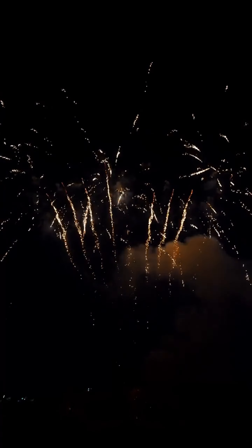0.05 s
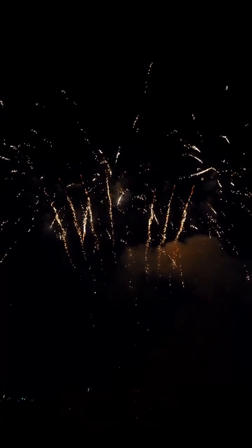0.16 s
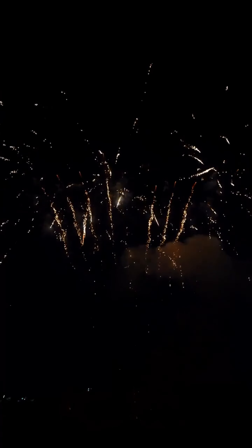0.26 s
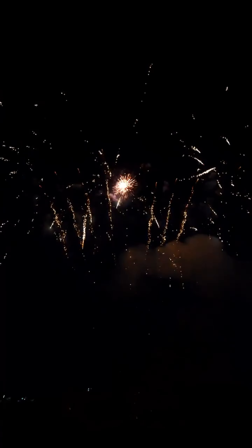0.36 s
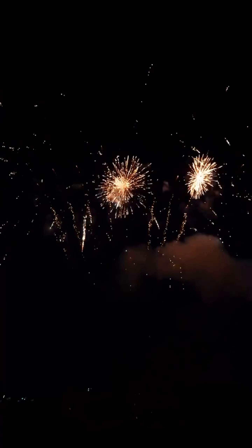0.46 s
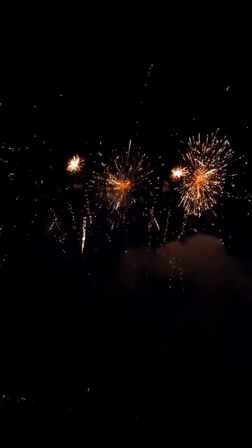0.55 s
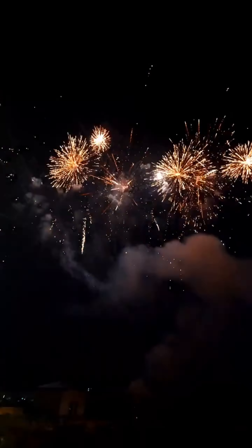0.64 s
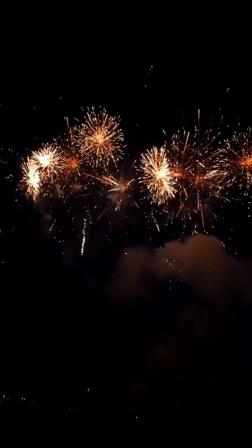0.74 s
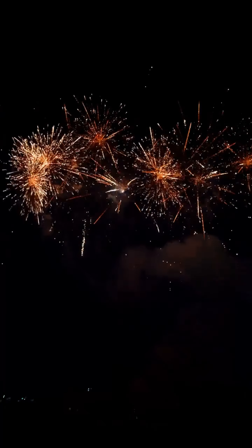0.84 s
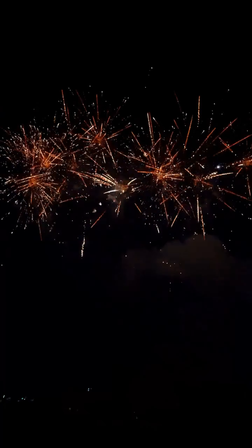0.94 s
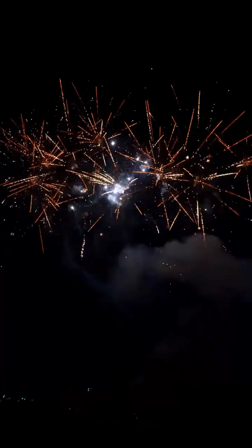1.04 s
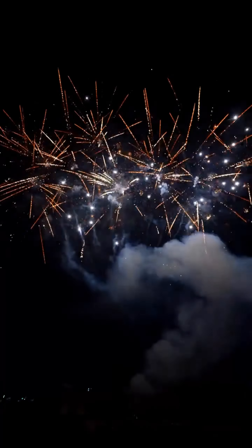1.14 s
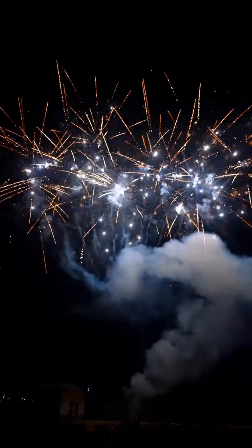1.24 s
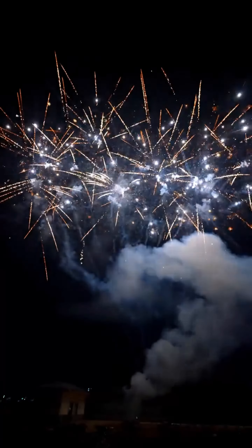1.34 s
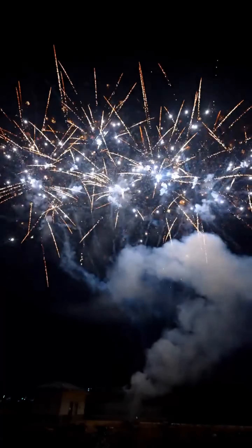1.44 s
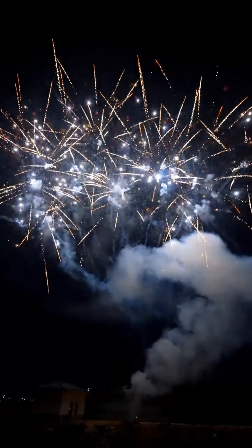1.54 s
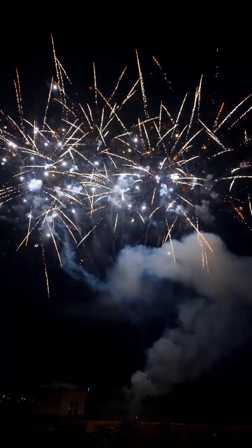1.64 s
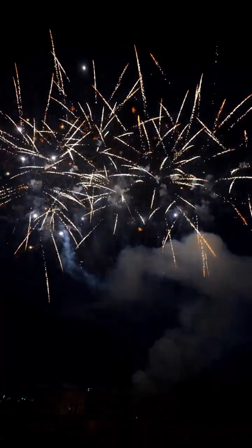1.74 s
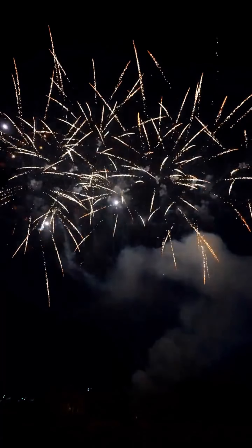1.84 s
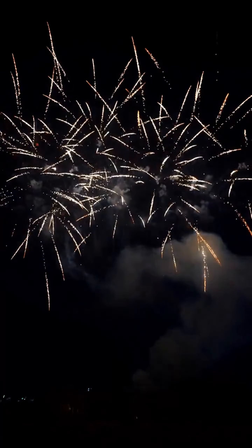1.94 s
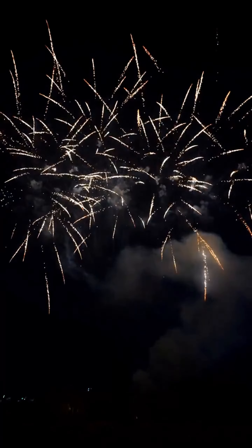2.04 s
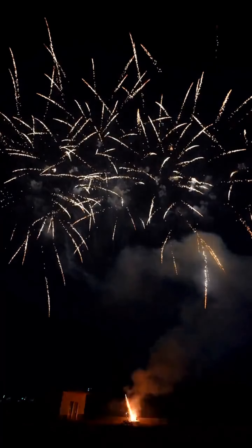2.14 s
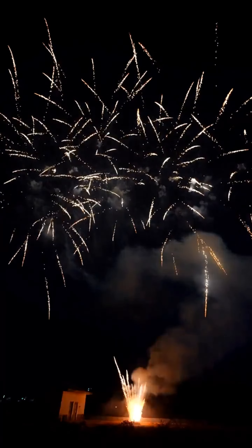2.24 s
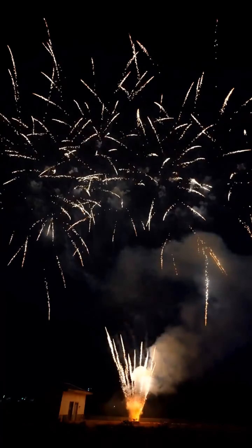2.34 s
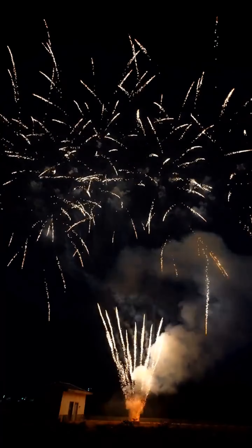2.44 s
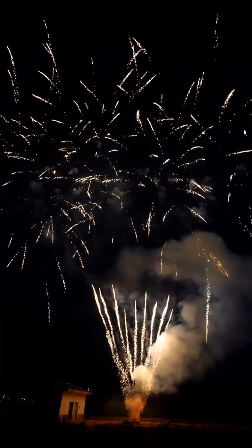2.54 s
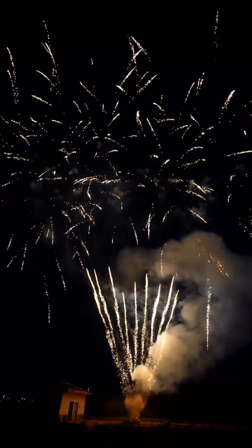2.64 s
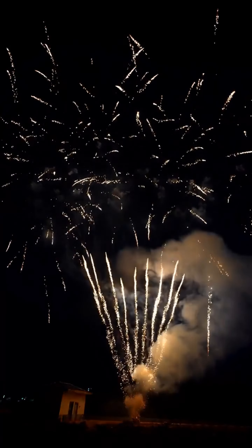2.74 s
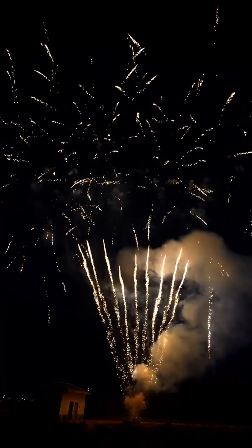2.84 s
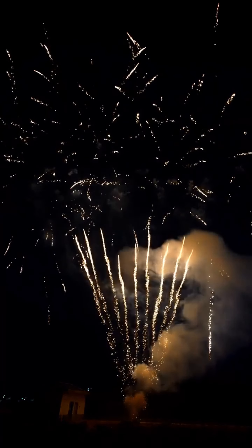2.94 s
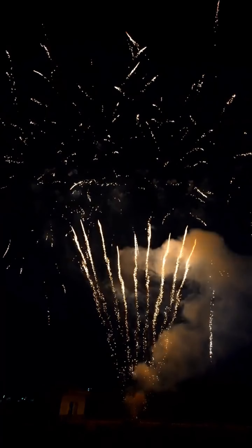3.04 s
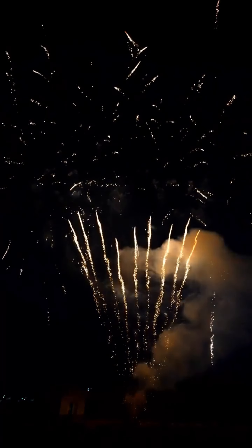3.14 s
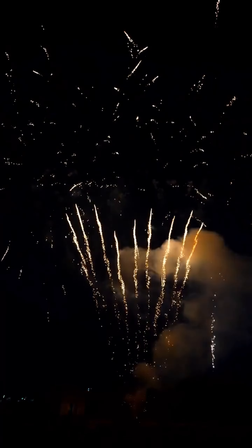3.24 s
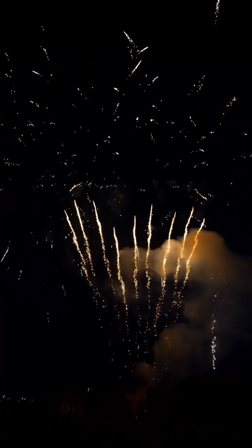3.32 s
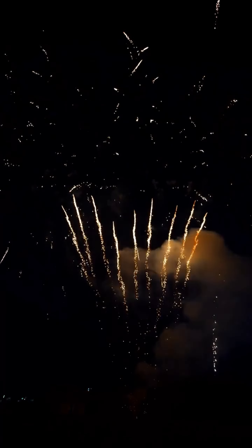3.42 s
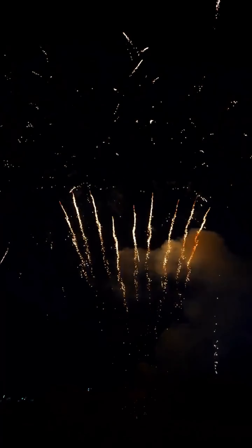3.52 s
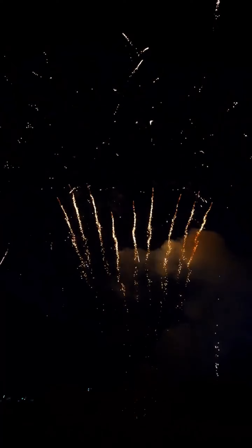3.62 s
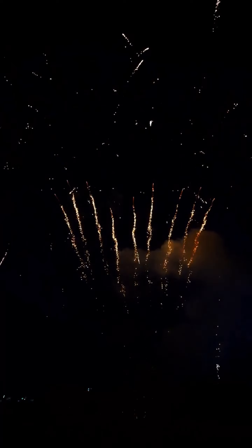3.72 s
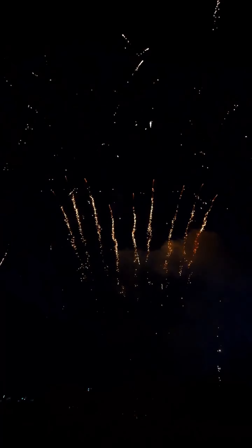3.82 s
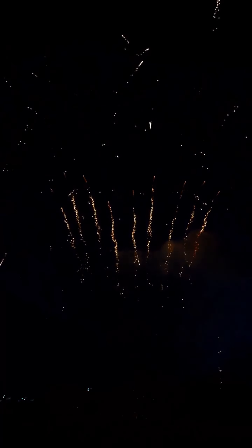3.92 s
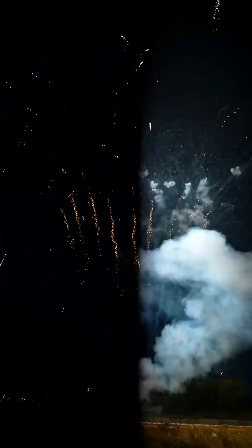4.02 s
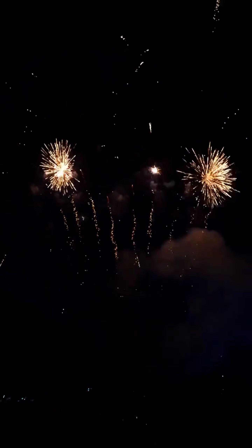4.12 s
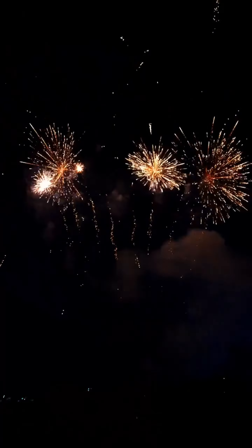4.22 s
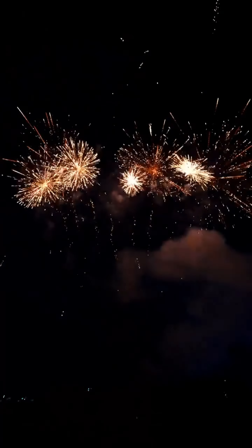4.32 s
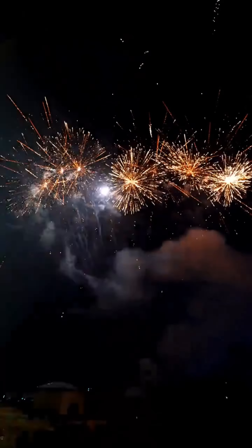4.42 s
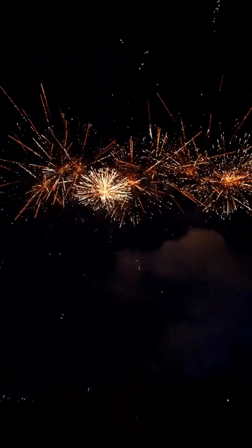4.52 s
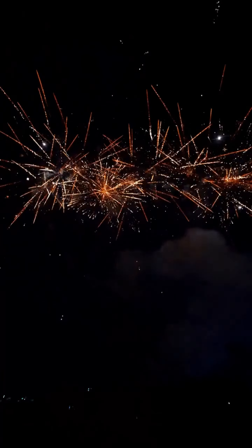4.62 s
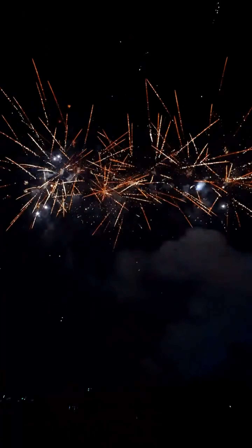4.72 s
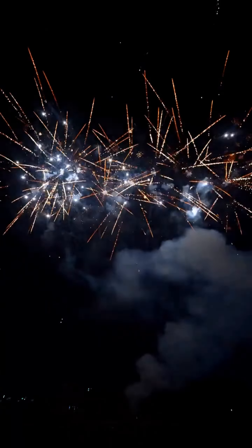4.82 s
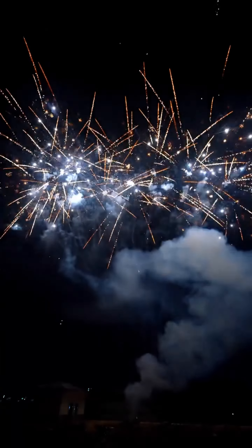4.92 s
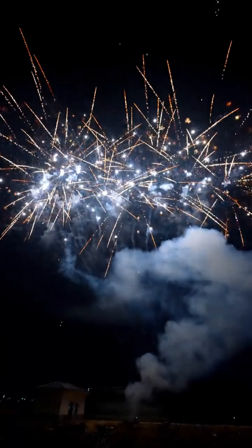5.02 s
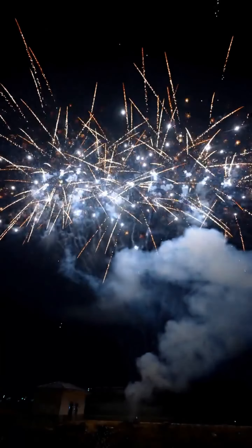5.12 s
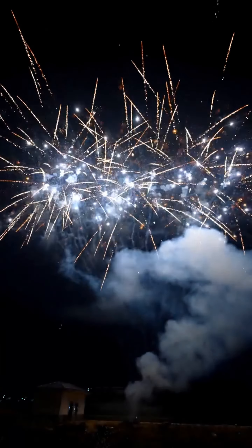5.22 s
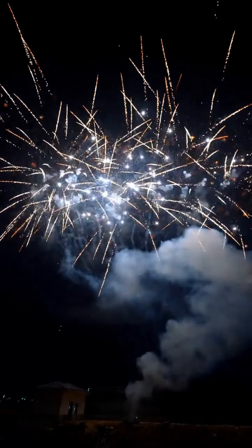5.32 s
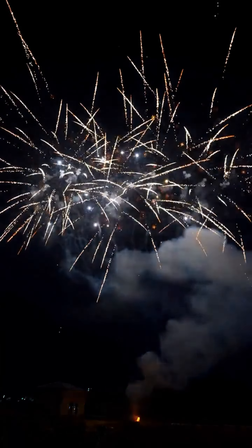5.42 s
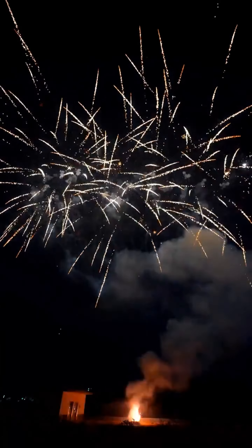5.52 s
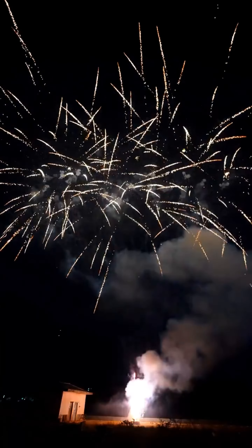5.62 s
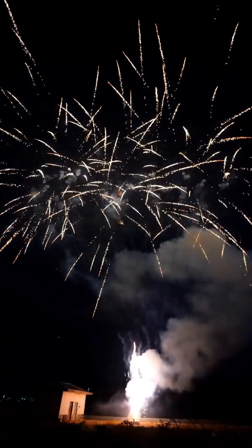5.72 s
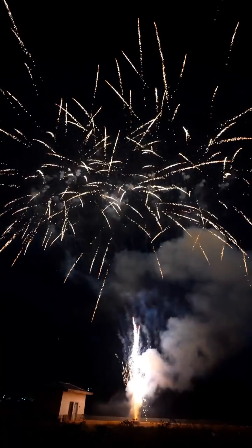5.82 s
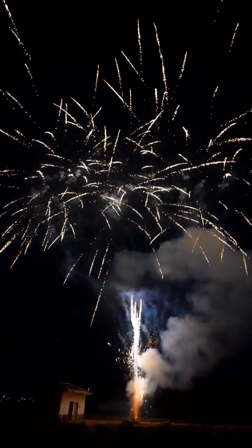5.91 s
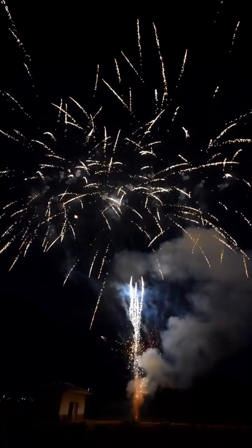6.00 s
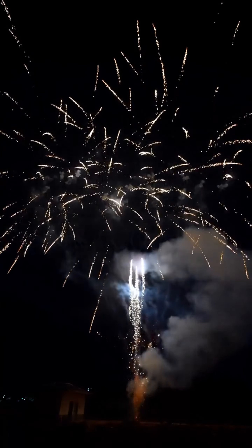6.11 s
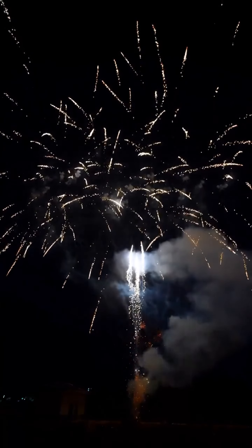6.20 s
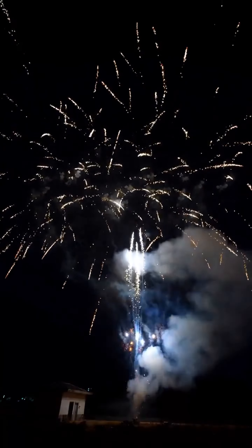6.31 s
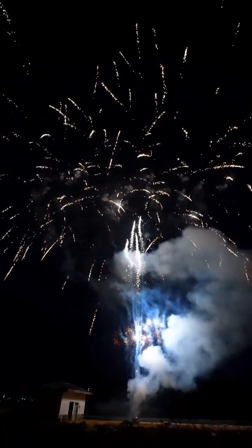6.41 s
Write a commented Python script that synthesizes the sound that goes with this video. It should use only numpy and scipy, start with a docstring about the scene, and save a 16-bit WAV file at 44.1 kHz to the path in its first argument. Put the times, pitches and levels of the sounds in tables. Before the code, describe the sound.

Outdoors at night, a faint hiss and a dying echo, then a half-second barrage of hard firework bangs with ragged tearing. Dense crackling blooms and thins; a quick row of hollow launch thumps follows. After a quiet lull a second barrage and crackle come, then more thumps and several shrill, beating whistles that sink in pitch. Stereo microphones at some distance, with open-field echoes and loud peaks squashed.

```python
"""Shells of a fireworks cake burst in volleys over an open field at night, each bang doubled by the ground.
Blasts are filtered pressure jumps with a noise tear; star crackle and tearing casings are random pops.
Lift charges thump as swinging tubes. The last fan carries whistlers: beating partials over a hoarse exhaust.
Far thuds, a distant bank, decaying echo noise from the land and a faint hiss lie behind.
"""
import sys
import numpy as np
from scipy import signal
from scipy.fft import rfft, irfft, next_fast_len
from scipy.io import wavfile
from scipy.ndimage import uniform_filter1d, minimum_filter1d, map_coordinates

SR = 44100
rng = np.random.default_rng(int(sys.argv[2]) if len(sys.argv) > 2 else 0)


def wav_record(signal):
    """Record a signal, one row per channel, as 16-bit PCM in the file named by sys.argv[1]."""
    frames = np.transpose(np.atleast_2d(signal))
    bounded = np.clip(frames, -1, 1)
    # unit amplitude maps onto the largest positive 16-bit level
    quanta = np.round(bounded * 32767).astype(np.int16)
    wavfile.write(sys.argv[1], SR, quanta)


N = 284886

# shells heard one by one, loud and faint:
# t/s, blast level/dB, casing crack level/dB, ground bounce lag/s; levels before trims
SINGLE_SHELLS = [(0.5436, 3, -6.5, 0.0067), (0.5805, -11, -23, 0.0062), (0.6261, -1, -17, 0.007),
                 (0.671, -9.5, -22, 0.0098), (0.7529, -4, -17, 0.0059), (0.7663, -4, -12, 0.0072),
                 (0.7825, -2, -18, 0.0078), (0.7963, -4.5, -28, 0.0082), (0.8195, -17, -26, 0.007),
                 (0.8493, -3.5, -20, 0.0057), (0.8802, 3, -12, 0.0073), (0.8955, -0.5, -4, 0.0084),
                 (0.9205, -9, -25, 0.0069), (0.943, -2, -18, 0.0075), (0.9488, -5, -21, 0.0077),
                 (0.9848, -11, -15, 0.003), (0.9957, -7, -19, 0.0051), (1.0194, -2.5, -10, 0.0044),
                 (1.0303, -2, -26, .006), (4.268, -0.5, -7, 0.0075), (4.303, -11, -31, 0.0067),
                 (4.326, -8, -26, 0.0051), (4.3398, -2, -16, 0.0066), (4.3735, -8.5, -40, 0.0058),
                 (4.401, -6, -13, 0.0051), (4.4246, -3, -10, 0.0064), (4.4461, 0, -26, 0.0069),
                 (4.4665, -16, -30, 0.0071), (4.4843, -1.5, -39, .0066), (4.498, -4, -21, 0.0066),
                 (4.5258, -8, -27, 0.0081), (4.5338, -10, -13, 0.0083), (4.556, -5.5, -29, 0.0062),
                 (4.5776, -1, -24, 0.0064), (4.6055, -9, -19, 0.0051), (4.6287, -1.5, -18, 0.0063),
                 (4.681, -17, -15, 0.0049), (4.7132, -12, -19, 0.0074), (4.727, -8, -18, 0.0074),
                 (4.7512, -9.5, -27, 0.0069), (4.768, -18, -35, 0.0068)]
# volleys that further shells fill in: start t/s, end t/s
VOLLEYS = [(0.65, 0.95), (4.281, 4.66)]
WEAK_BLAST_DB, WEAK_CRACK_DB, WEAK_BOUNCE_S = -15.5, -24, 0.0059


def shells():
    """Rows of all shells: single ones, plus weaker ones strewn through each volley, faint blast, fainter crack."""
    weak = []
    for start, end in VOLLEYS:
        slots = rng.random(size=8)
        times = start + (end - start) * (np.arange(len(slots)) + slots) / len(slots)
        weak += [(s, WEAK_BLAST_DB, WEAK_CRACK_DB, WEAK_BOUNCE_S) for s in times]
    return SINGLE_SHELLS + weak


# casing crack spectrum: f/Hz, level/dB per Hz
CRACK_SPECTRUM = [(100, -23), (400, 4), (900, 2), (2000, -2), (5000, -12.5), (10000, -15), (16000, -28)]
# echo spectrum of a burst: f/Hz, level/dB per Hz
BURST_ECHO_SPECTRUM = [(25, -34), (70, -4.5), (140, 4.5), (280, -9.5), (450, -3.5), (800, -9.5),
                       (1600, -11.5), (4000, -35), (9000, -18.5), (16000, -19)]
BLAST_HZ, BLAST_SPREAD_OCT = 238, 0.35  # centre of the swing; reach either way from shell to shell


def bursts(shots, ground_db=-2.5, blast_db=-0.5, crack_db=-0.5, echo_db=10.5, crack_life_s=0.0014):
    """Each shell: a shock from its own bearing, the same again off the ground, then the field's echo."""
    out = np.zeros((2, N))
    t = np.arange(SR // 10) / SR
    tear_envelope = np.exp(-t / crack_life_s) + .15 * np.exp(-t / .018)
    for s, db, casing_db, bounce_s in shots:
        bearing, size = 2 * rng.random(2) - 1
        swing_hz = BLAST_HZ * 2 ** (BLAST_SPREAD_OCT * size)
        shock = blast(push_s=0.003, low_hz=swing_hz, damping=0.32, cut_hz=39)
        shock = peaked(dull(shock, edge_hz=1600))
        for ear, sign in zip(out, (1, -1)):
            tear = rng.standard_normal(len(t)) * tear_envelope
            crack = signal.fftconvolve(tear, click(CRACK_SPECTRUM))[:len(t)]
            bang = amp(db + blast_db) * shock + amp(crack_db + casing_db) * crack
            lag_s = sign * (bearing * .00018 + .00005)
            # direct sound leans right, ground bounce left
            add(ear, s + lag_s, amp(-sign * 0.44) * bang)
            add(ear, s + bounce_s - lag_s, amp(ground_db + sign * 0.75) * dull(bang, edge_hz=1700))
        add(out, s, amp(db + echo_db) * field(BURST_ECHO_SPECTRUM, build_s=0.011))
    return out


def blast(push_s, low_hz, damping, cut_hz):
    """A pressure jump and its suction, swinging at low_hz and once more in the microphone's bass cut."""
    u = np.arange(SR // 10) / SR / push_s
    wave = swing((u - 1) * np.exp(-u), (1, 0, 0), low_hz, damping)
    return swing(wave, (1, 0, 0), cut_hz, damping=0.28)


# shells that tear open raggedly: loudest t/s, half length/s, level/dB before trim
TEARING_SHELLS = [(.585, .008, -33), (.673, 0.025, -20), (.72, 0.031, -30), (.757, 0.015, -16),
                  (.835, 0.014, -30), (.938, 0.0065, -19), (.995, 0.019, -21), (1.042, 0.015, -14),
                  (4.315, 0.02, -22.5), (4.379, 0.0081, -31), (4.407, 0.016, -19), (4.535, .007, -26),
                  (4.553, 0.0086, -29), (4.616, 0.014, -22), (4.73, .008, -25), (4.752, 0.0098, -29)]
# tearing spectrum: f/Hz, level/dB per Hz
RIP_SPECTRUM = [(150, -15), (450, -7.5), (900, 2.5), (1500, -6.5), (2500, -1.5), (4000, -21), (7000, -9),
                (16000, -27)]


def rips(rip_db=-1):
    """Casings that tear open bit by bit: a quick run of coarse pops."""
    tearing = pops(rate_per_s=1200, spread_db=1.4, spectrum=RIP_SPECTRUM, wet=.25)
    return amp(rip_db) * swells(TEARING_SHELLS) * tearing


# star snap spectrum: f/Hz, level/dB per Hz
SNAP_SPECTRUM = [(100, -42), (400, -12.5), (800, -8.5), (1300, -0.5), (2100, 1), (3200, -5), (6000, -7.5),
                 (16000, -28.5)]
# star fizz spectrum: f/Hz, level/dB per Hz
FIZZ_SPECTRUM = [(500, -44), (1800, 0), (3500, 1), (5000, -1), (7000, -1.5), (8200, -8.5), (11000, -11),
                 (14000, -14), (16000, -57)]
# flare levels at one shell a second; COMET_DB: a launch row re a shell
FLARE_SNAP_DB, FLARE_FIZZ_DB, COMET_DB = -43, -47, -11
FLARE_S = 0.021  # time constant of rise and of fade
# sparks behind the climbing whistlers; TRAIL_DB is the level at TRAIL_FULL_S
TRAIL_DB, TRAIL_GROWS_DB_PER_S, TRAIL_FULL_S = -21, 35, 6.6


def crackle(shots, stray_db=-18):
    """Stars break up in clumps: larger snaps over a fine fizz; single pops stand out as the cloud thins."""
    snaps = pops(rate_per_s=2000, spread_db=1.8, spectrum=SNAP_SPECTRUM, wet=.3)
    fizz = pops(rate_per_s=3200, spread_db=1.1, spectrum=FIZZ_SPECTRUM, wet=.45)
    strays = pops(rate_per_s=75, spread_db=1.2, spectrum=FIZZ_SPECTRUM, wet=.15)
    clumps = amp(.5 * wobble(45) + .7 * wobble(160))
    cloud_snap, cloud_fizz = clouds()
    # every shell and launch row adds a short flare of sparks
    flare_power = firing(shots) + amp(COMET_DB) ** 2 * firing(LAUNCH_THUMPS)
    flare = linger(flare_power, FLARE_S, FLARE_S)
    to_full_s = np.minimum(np.arange(N) / SR - TRAIL_FULL_S, 0)
    trail = during(CHORUS_LEVEL) * amp(TRAIL_DB + TRAIL_GROWS_DB_PER_S * to_full_s)
    snap_gain = np.linalg.norm([cloud_snap, amp(FLARE_SNAP_DB) * flare, trail], axis=0)
    fizz_gain = np.linalg.norm([cloud_fizz, amp(FLARE_FIZZ_DB) * flare, trail], axis=0)
    # single pops fade later than the fizz
    stray_gain = amp(stray_db) * np.minimum(amp(14.5) * fizz_gain, amp(-21) + .4 * fizz_gain)
    wide_fizz = fizz * amp([[-.6], [.6]])
    return clumps * (snap_gain * snaps + fizz_gain * wide_fizz + stray_gain * strays)


# star clouds, one after each volley:
# densest t/s, rise/s, fall/s, snap level/dB, fizz level/dB, rise abruptness (exponent)
STAR_CLOUDS = [(1.7, 0.54, 0.5, -18, -22, 4), (5.301, 0.41, 0.54, -19.5, -19, 4.65)]
CLOUD_EDGE_DB, FALL_ABRUPTNESS = 15, 3.34  # drop at one rise or fall time from the middle; exponent


def clouds():
    """Snap and fizz amplitudes of the star clouds: each catches quickly, holds and thins out."""
    t, snap, fizz = np.arange(N) / SR, 0, 0
    for s, rise_s, fall_s, snap_db, fizz_db, rise_abruptness in STAR_CLOUDS:
        away = np.abs((t - s) / np.where(t < s, rise_s, fall_s))
        abruptness = np.where(t < s, rise_abruptness, FALL_ABRUPTNESS)
        swell = amp(-CLOUD_EDGE_DB * away ** abruptness)
        snap = snap + amp(snap_db) * swell
        fizz = fizz + amp(fizz_db) * swell
    return snap, fizz


def pops(rate_per_s, spread_db, spectrum, wet):
    """Tiny explosions, rms 1: each has its own size, bearing and ground bounce, over a steady diffuse noise."""
    count = int(rate_per_s * N / SR)
    when, bearing, height, size = rng.random((count, 4)).T
    gain = amp(spread_db * np.minimum(-np.log(1 - size), 4))
    bounce = SR * (.005 + .003 * height)  # samples
    train = np.zeros((2, N))
    for ear, sign in zip(train, (1, -1)):
        at = when * N + sign * bearing * SR * .0003 - sign * SR * .00014
        for delay, strength in ((0, 1), (bounce, .55)):
            strengths = strength * gain * amp(2 * rng.standard_normal(count))
            ear -= np.bincount((at + delay).astype(int) % N, strengths, N)
    dry = unit(signal.fftconvolve(train - train.mean(), click(spectrum)[None], axes=1)[:, :N])
    return unit(dry + wet * diffuse(spectrum))


# lift charges in the tubes and their close echoes:
# t/s, thump level/dB, muzzle crack level/dB re thump, tube damping ratio; levels before trims
LAUNCH_THUMPS = [(2.2668, -5, -9, 0.2), (2.286, -17, -10, 0.1), (2.301, -11, -7, 0.092),
                 (2.3161, -2.5, -9, 0.066), (2.329, -7, -3.5, 0.068), (2.3384, -6.5, -3, .12),
                 (2.351, -8.5, -6.5, 0.083), (2.364, -7.5, -12, 0.057), (2.3734, -5.5, -9, 0.095),
                 (2.407, -16, -3.5, 0.11), (2.42, -20.5, -2, .12), (5.667, -11, -5, .08),
                 (5.705, -6, -11, 0.23), (5.726, -16, -12, .12), (5.7417, -12, -13, .12),
                 (5.757, -15, -10, 0.11), (5.774, -6, -11, 0.21), (5.7899, -10, -3, 0.13),
                 (5.8097, -4, -16, 0.23), (5.822, -8, -12, 0.14), (5.8435, -11, -16, .12),
                 (5.8471, -8, -12, .12), (5.8772, -8.5, -9, .13), (5.895, -19, -8, .1),
                 (5.9114, -9, -14, .14), (5.925, -19.5, -10, .12)]
# muzzle crack spectrum: f/Hz, level/dB per Hz
MUZZLE_SPECTRUM = [(200, -4), (450, 10.5), (1000, 3), (1800, 5.5), (2800, -7), (4300, 1), (6500, -6),
                   (8000, -8), (16000, -19)]
# launch echo spectrum: f/Hz, level/dB per Hz
TUBE_ECHO_SPECTRUM = [(30, -31), (80, -11), (140, 1), (220, 0), (280, 1.5), (380, -18), (750, -12.5),
                      (2000, -18), (6000, -27)]
TUBE_HZ, WHISTLER_TUBE_HZ, WHISTLER_FAN_S = 212, 206, 5.6  # whistlers' tubes sound deeper
COMET_RISE_S, SPIT_DB = 0.017, -51.5  # late-catching comets; spark level at one row a second


def launches(thump_db=-7.5, crack_db=-5, echo_db=6):
    """Lift charges and close echoes: muzzle crack, swings of the cardboard tube, the comet's hiss and sparks."""
    out = np.zeros((2, N))
    t = np.arange(SR // 4) / SR
    gas_envelope = .6 * np.exp(-t / .0022) + .16 * np.exp(-t / .008) + .03 * np.exp(-t / .045)
    for s, db, muzzle_db, damping in LAUNCH_THUMPS:
        tube_hz = TUBE_HZ if s < WHISTLER_FAN_S else WHISTLER_TUBE_HZ
        thump = blast(push_s=0.01, low_hz=tube_hz, damping=damping, cut_hz=77)
        tube = peaked(swing(thump, (0, 0, 1), hz=420, damping=1.0))
        gas = rng.standard_normal((2, len(t))) * gas_envelope
        spurts = amp(1.2 * wobble(220)[:len(t)] - 1)
        spit = signal.fftconvolve(gas * spurts, click(MUZZLE_SPECTRUM)[None], axes=1)
        add(out, s, amp(db + thump_db) * tube)
        add(out, s, amp(db + muzzle_db + crack_db) * spit)
        add(out, s, amp(db + echo_db) * field(TUBE_ECHO_SPECTRUM, build_s=0.0051))
    sparks = pops(rate_per_s=380, spread_db=2.2, spectrum=SNAP_SPECTRUM, wet=.15)
    return out + amp(SPIT_DB) * linger(firing(LAUNCH_THUMPS), COMET_RISE_S, COMET_RISE_S) * sparks


# common pitch: t/s, f/Hz
WHISTLE_PITCH = [(5.7, 1173), (5.87, 1136), (6.02, 1107), (6.17, 1062), (6.3, 1031), (6.46, 1008)]
# burn of the beating whistlers: t/s, level/dB before each one's own level
CHORUS_LEVEL = [(5.69, -47), (5.712, -26), (5.77, -31), (5.815, -25.5), (5.862, -20), (5.935, -30),
                (6.01, -23.5), (6.19, -22), (6.37, -22.5), (6.46, -27.5)]
# partials: multiple of the pitch, level/dB (overtones before the brightening)
WHISTLE_PARTIALS = [(1, 1.5), (2, -9.5), (3, -5), (4, -17), (6, -17)]
# tubes tuned a little apart, so they beat: pitch ratio, level/dB
WHISTLER_TUNINGS = [(.979, -4.5), (.996, -5.5), (1.017, -5), (1.04, -11)]
# hoarse exhaust, quick to rise, then wavering: t/s, level/dB
EXHAUST_LEVEL = [(5.69, -40), (5.85, -28.5), (6.07, -31), (6.12, -27.5), (6.2, -28.5), (6.35, -30),
                 (6.46, -30.5)]
# hoarse exhaust spectrum, at EXHAUST_PITCH_HZ: f/Hz, level/dB per Hz
EXHAUST_SPECTRUM = [(1300, -4.5), (1550, 1.5), (2300, -11), (2600, 4), (2850, -16), (3250, 1), (3620, 6),
                    (3900, 1), (4300, 3.5), (5000, -5), (6150, -3), (6700, -15), (7200, -1), (7900, -9.5),
                    (9200, -9), (14000, -40)]
# nearest whistler, burning in fits: t/s, half length/s, level/dB
NEAREST_SURGES = [(5.714, 0.0039, -11), (5.732, 0.012, -14), (5.817, 0.0038, -12), (5.843, 0.0074, -17),
                  (5.862, 0.008, -7), (5.887, 0.01, -17.5), (5.904, 0.0064, -14), (5.962, 0.0069, -12.5),
                  (5.992, .011, -11.5), (6.02, .011, -11), (6.045, 0.014, -10.5), (6.082, 0.0082, -17),
                  (6.112, 0.0063, -13), (6.143, 0.0058, -7.5), (6.167, 0.012, -10), (6.197, .009, -6),
                  (6.218, 0.0079, -10), (6.265, 0.015, -8.5), (6.31, 0.0095, -8), (6.335, 0.0068, -16),
                  (6.355, 0.012, -9), (6.375, 0.0047, -12), (6.43, 0.0086, -24)]
# thinner whistler's chirps: t/s, half length/s, level/dB
THIN_CHIRPS = [(5.702, .006, -25), (5.756, .009, -20), (5.785, .01, -20), (5.815, .007, -28)]
EXHAUST_PITCH_HZ = 1050
OVERTONE_DB, BRIGHTENS_DB_PER_S = -5.5, 6.5  # overtones at ignition; their growth
SURGE_SCATTER, CHIRP_HZ, CHIRP_RASP = .012, 3900, .016  # scatter and rasp: pitch ratio


def whistlers(burn_db=0, exhaust_db=0, surge_db=0, right_db=-7):
    """One whistle surges over several that beat; pitch sinks and overtones grow as fuel burns into the tubes."""
    (hz,), (db,), (jet_db,) = curves(WHISTLE_PITCH), curves(CHORUS_LEVEL), curves(EXHAUST_LEVEL)
    age_s = np.maximum(np.arange(N) / SR - CHORUS_LEVEL[0][0], 0)
    harsh_db = OVERTONE_DB + BRIGHTENS_DB_PER_S * age_s
    burn = during(CHORUS_LEVEL) * amp(db + burn_db)
    chorus = 0
    for ratio, level_db in WHISTLER_TUNINGS:
        whistle = burn * amp(level_db) * pipe(ratio * hz, WHISTLE_PARTIALS, harsh_db)
        chorus = chorus + many_paths(whistle, share=.8)
    shaken_hz = hz * (1 + SURGE_SCATTER * wobble(60) + FLUTTER * wobble(300))
    phase = 2 * np.pi * np.cumsum(shaken_hz) / SR
    nearest = many_paths(amp(surge_db) * swells(NEAREST_SURGES) * np.sin(phase), share=.2)
    # noise read at a varying speed: its resonances sink with the pitch
    slide = np.cumsum(hz / EXHAUST_PITCH_HZ) % (N - 1)
    jet = np.array([map_coordinates(ear, [slide]) for ear in diffuse(EXHAUST_SPECTRUM)])
    exhaust = during(EXHAUST_LEVEL) * amp(jet_db + exhaust_db) * jet
    rasp = amp(1.5 * wobble(160))
    chirp = pipe(CHIRP_HZ * (1 + CHIRP_RASP * wobble(500)), [(1, 0)], 0)
    thin = many_paths(swells(THIN_CHIRPS) * chirp, share=.5)
    tones = nearest * amp([[0], [right_db]]) + chorus * amp([[0], [-2.5]])
    return tones + (rasp * exhaust + thin) * amp([[1], [-2]])


FLUTTER, DRIFT = .009, .006  # fast and slow pitch shake, ratio
SPUTTER_DB, SPUTTER_PER_S = 2.5, 130
OVERTONE_BLUR_RAD, BLUR_PER_S, OVERTONE_FLICKER_DB = .5, 300, 3.2  # times ln(multiple)


def pipe(hz, tone, overtone_db):
    """One whistle: the flame shakes pitch and level; higher overtones flicker and blur more."""
    shaken_hz = hz * (1 + FLUTTER * wobble(250) + DRIFT * wobble(14))
    phase = 2 * np.pi * (rng.random() + np.cumsum(shaken_hz) / SR)
    flicker_db = OVERTONE_FLICKER_DB * wobble(BLUR_PER_S / 2)
    blur = OVERTONE_BLUR_RAD * wobble(BLUR_PER_S)
    partials = 0
    for k, db in tone:
        gain = amp(db + (k > 1) * overtone_db + np.log(k) * flicker_db)
        partials = partials + gain * np.sin(k * phase + np.log(k) * blur)
    return partials * amp(SPUTTER_DB * wobble(SPUTTER_PER_S))


# far-off thuds: t/s, peak level/dB before trim
FAR_THUDS = [(2.522, -16), (2.585, -16), (3.474, -25), (4.144, -17)]


def thuds(thud_db=-15.0):
    """Far reports, rounded by the distance."""
    out = np.zeros((2, N))
    for s, db in FAR_THUDS:
        report = blast(push_s=0.001, low_hz=254, damping=0.098, cut_hz=220)
        add(out, s, amp(db + thud_db) * peaked(swing(report, (0, 0, 1), hz=500, damping=0.98)))
    return out


FAR_BANK_S, FAR_BANK_DB = 0.53, -23.5


def far_bank(sound):
    """A distant bank sends a sound back late and dull."""
    out = np.zeros((2, N))
    returned = many_paths(dull(sound.mean(axis=0), edge_hz=2000), share=0.093)
    add(out, FAR_BANK_S, amp(FAR_BANK_DB) * returned)
    return out


# shell echo spectrum: f/Hz, level/dB per Hz
RUMBLE_SPECTRUM = [(20, -39), (50, -12.5), (100, -9), (190, 0.5), (310, 4), (450, -2.5), (700, -25),
                   (2000, -59)]
# crackle echo spectrum: f/Hz, level/dB per Hz
WASH_SPECTRUM = [(200, -31), (450, -11), (750, 1.5), (1400, -6), (2500, -10.5), (4000, -22.5),
                 (8000, -35.5)]
# background hiss spectrum: f/Hz, level/dB per Hz
HISS_SPECTRUM = [(100, -10), (3000, -46), (5500, -18), (7000, -2.5), (8500, 7), (10000, 0), (12000, -12),
                 (16000, -56)]
# background hiss: t/s, level/dB
NIGHT_LEVEL = [(0, -57.5), (0.53, -56), (2.7, -62.5), (3.3, -61), (4.25, -54.5)]
ECHO_RISE_S, NEAR_FADE_S, FAR_FADE_S = 0.014, 0.15, 0.77  # time constants of echo energy
EARLIER_RUMBLE_DB, EARLIER_WASH_DB = -45, -44  # an earlier volley still dying away, at t = 0


def land(shots, near_db=-44.5, far_db=-50.0, shell_wash_db=-48, star_wash_db=-14.5, far_wash_db=-22,
         low_floor_db=9):
    """Lumpy echoes from near and far: shells as a rumble, crackle as a wash, over a faint night background."""
    rate = firing(shots)
    star_power = clouds()[0] ** 2
    near = linger(rate, ECHO_RISE_S, NEAR_FADE_S)
    far = linger(rate, ECHO_RISE_S, FAR_FADE_S)
    earlier = np.sqrt(np.exp(-np.arange(N) / SR / FAR_FADE_S))
    night = amp(curves(NIGHT_LEVEL)[0])
    rumble = np.linalg.norm([amp(near_db) * near, amp(far_db) * far,
                             amp(EARLIER_RUMBLE_DB) * earlier, amp(low_floor_db) * night], axis=0)
    wash = np.linalg.norm([amp(shell_wash_db) * near, amp(star_wash_db) * linger(star_power, 0.006),
                           amp(far_wash_db) * linger(star_power, FAR_FADE_S),
                           amp(EARLIER_WASH_DB) * earlier], axis=0)
    lumpy_rumble = rumble * amp(1.8 * wobble(22)) * diffuse(RUMBLE_SPECTRUM)
    lumpy_wash = wash * amp(wobble(35)) * diffuse(WASH_SPECTRUM)
    return lumpy_rumble + lumpy_wash + night * diffuse(HISS_SPECTRUM)


def many_paths(x, share):
    """The direct sound plus its short scatter off the ground, different at each port."""
    t = np.arange(SR // 12) / SR
    paths = rng.standard_normal((2, len(t))) * np.exp(-t / 0.16)
    return x + share * signal.fftconvolve(x[None], paths / np.linalg.norm(paths[0]), axes=1)[:, :N]


# echo decay over the field: f/Hz, t60/s
FIELD_T60 = [(100, 1.3), (400, 0.81), (1500, 1.63), (5000, 1.43), (14000, 0.24)]


def field(spectrum, build_s):
    """A fresh stereo echo tail, left energy 1: it builds up, then decays at each frequency's own t60."""
    hz, t, z = signal.stft(diffuse(spectrum, size=SR), SR, nperseg=256)
    decay = amp(-60 * t / along(FIELD_T60, hz)[:, None])
    tail = signal.istft(z * decay * (1 - np.exp(-t / build_s)), SR, nperseg=256)[1]
    return tail / np.linalg.norm(tail[0])


# left-right likeness of diffuse sound: f/Hz, correlation
EAR_LIKENESS = [(100, 1), (250, 1), (500, 0.94), (1000, 0.72), (2000, 0.16), (7000, 0.084), (8400, 0.6),
                (11000, 0.1)]


def diffuse(spectrum, size=N):
    """Noise of rms 1 from all sides: mid and side shares set the left-right likeness by frequency."""
    m = next_fast_len(size, True)
    hz = np.fft.rfftfreq(m, 1 / SR)
    turn = np.arccos(np.clip(along(EAR_LIKENESS, hz), -1, 1)) / 2
    noise = rfft(rng.standard_normal((2, m))) * amp(along(spectrum, hz))
    mid, side = irfft(noise * [np.cos(turn), np.sin(turn)], m)[:, :size]
    return unit(np.array([mid + side, mid - side]))


def click(spectrum, size=1024):
    """The sharpest causal pulse (minimum phase) of a given spectrum, peak 1."""
    cepstrum = irfft(np.log(amp(along(spectrum, np.fft.rfftfreq(size, 1 / SR)))))
    cepstrum[1:size // 2] *= 2
    cepstrum[size // 2 + 1:] = 0
    return peaked(irfft(np.exp(rfft(cepstrum))))


def swing(x, top, hz, damping):
    """A two-pole filter with numerator top, in powers of s / w."""
    w = 2 * np.pi * hz
    b, a = signal.bilinear(np.multiply(top, [1, w, w * w]), [1, 2 * abs(damping) * w, w * w], SR)
    return signal.lfilter(b, a, x)


def dull(x, edge_hz):
    """A gentle treble loss: first-order low-pass."""
    return signal.lfilter(*signal.butter(1, min(edge_hz, SR / 2 - 1), fs=SR), x)


def firing(shots):
    """Shots per second: one spike for each row."""
    return SR * np.bincount([round(row[0] * SR) for row in shots], minlength=N)[:N].astype(float)


def linger(power, *lags_s):
    """The amplitude of a power smoothed by one-pole lags of the given time constants."""
    for lag_s in lags_s:
        keep = np.exp(-1 / (SR * abs(lag_s)))
        power = signal.lfilter([1 - keep], [1, -keep], power)
    return np.sqrt(power)


def swells(rows):
    """The amplitude of short bell-shaped swells, from rows of t/s, half length/s, level/dB."""
    t = np.arange(N) / SR
    return sum(amp(db) * np.exp(-np.minimum(((t - s) / half_s) ** 2, 60)) for s, half_s, db in rows)


def wobble(rate_per_s):
    """A smooth random curve, rate_per_s knots a second."""
    at = np.arange(0, N + 16, 16)  # spline every 16 samples, linear between
    knots = rng.standard_normal(int(N * rate_per_s / SR) + 4)
    return np.interp(np.arange(N), at, map_coordinates(knots, [at * rate_per_s / SR]))


def curves(rows):
    """One value per sample for each column after the time."""
    s, *cols = np.transpose(rows)
    return [np.interp(np.arange(N) / SR, s, c) for c in cols]


def during(rows):
    """A soft gate, open over the time that a table covers."""
    t = np.arange(N) / SR
    return uniform_filter1d(1.0 * ((t >= rows[0][0]) & (t <= rows[-1][0])), size=256)


def along(points, hz):
    """(f/Hz, value) points interpolated on a log frequency axis."""
    f, v = np.transpose(points)
    return np.interp(np.log(hz + 1), np.log(f + 1), v)


def add(track, s, sound):
    """Mix a sound into a track at time s."""
    part = track[..., max(round(s * SR), 0):][..., :sound.shape[-1]]
    part += sound[..., :part.shape[-1]]


def amp(db):
    """Decibels to gain."""
    return 10 ** (np.asarray(db) / 20)


def unit(x):
    """Scale to rms 1."""
    return x / np.sqrt(np.mean(x ** 2) + 1e-20)


def peaked(x):
    """Scale to peak 1."""
    return x / np.abs(x).max()


def scene():
    """Everything that reaches the two microphones."""
    shots = shells()
    bangs = bursts(shots) + launches()
    return bangs + rips() + crackle(shots) + whistlers() + thuds() + far_bank(bangs) + land(shots)


LIMIT_DB, TOP_HZ = -7, 15700  # limiter threshold; band limit


def record(dry):
    """A limiter ducks briefly around loud peaks; a soft clip rounds the highest, a band limit cuts the top."""
    level = np.sqrt(np.abs(uniform_filter1d(np.max(dry ** 2, axis=0), size=64)) + 1e-12)
    # the shifted window starts just ahead of a peak and holds after it
    needed = minimum_filter1d(np.minimum(1, amp(LIMIT_DB) / level), size=800, origin=340)
    ducked = dry * uniform_filter1d(needed, size=128)
    held = ducked / (1 + np.abs(ducked / .97) ** 6) ** (1 / 6)
    m = next_fast_len(N + SR // 2)
    return irfft(rfft(held, m) * (np.fft.rfftfreq(m, 1 / SR) < TOP_HZ), m)[:, :N]


dry = scene()
out = record(dry)
wav_record(out)
```